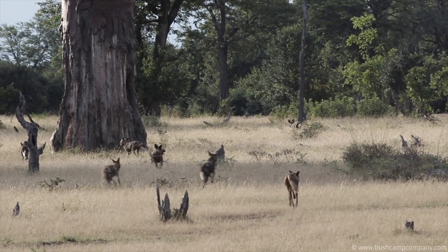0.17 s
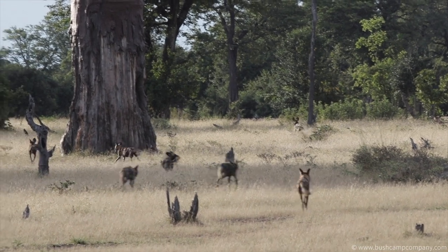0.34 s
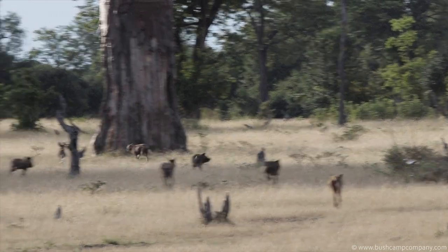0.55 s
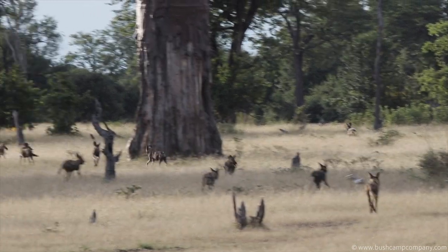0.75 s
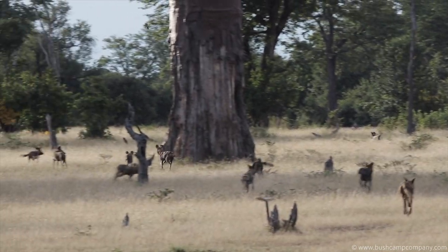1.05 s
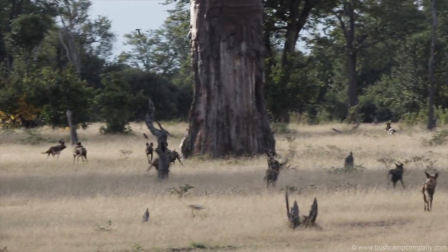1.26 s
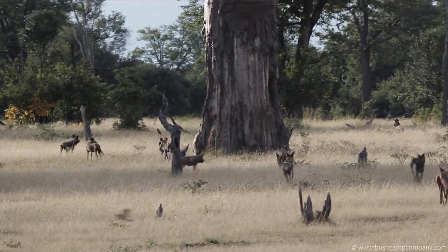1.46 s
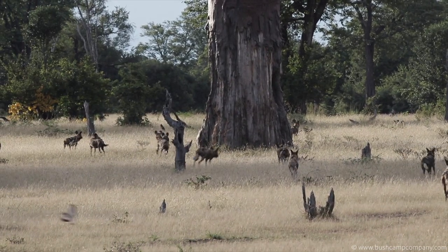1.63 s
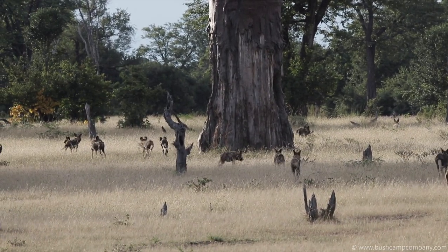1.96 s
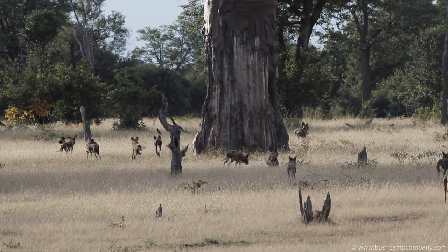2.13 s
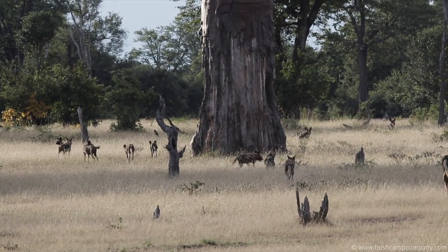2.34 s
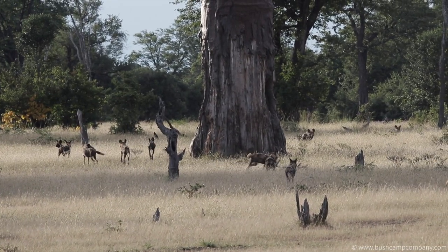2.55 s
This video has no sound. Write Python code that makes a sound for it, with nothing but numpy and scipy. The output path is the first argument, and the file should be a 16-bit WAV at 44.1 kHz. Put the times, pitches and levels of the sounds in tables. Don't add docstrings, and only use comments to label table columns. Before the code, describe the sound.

Wild dogs give overlapping squeaky twitters, off to the right, while low wind gusts thump the microphone.

```python
import sys
import numpy as np
from scipy import signal
from scipy.fft import rfft, irfft
from scipy.io import wavfile
from scipy.ndimage import uniform_filter1d

SR = 44100
rng = np.random.default_rng(int(sys.argv[2]) if len(sys.argv) > 2 else 0)


def boost_factor(decibels):
    exponent = np.asarray(decibels, float) / 20
    return 10 ** exponent


def store_wav(level_fs):
    pcm = np.round(np.clip(np.atleast_2d(level_fs), -1, 1) * 32767)
    wavfile.write(sys.argv[1], SR, pcm.T.astype(np.int16))


N = 119070

# [f/Hz, level/dB]
HISS_SPECTRUM = [(150, -13), (480, -8), (720, -8.5), (900, -15), (2800, -17.5), (5000, -23), (9000, -22.5),
                 (15000, -31.5)]

# [start t/s, length/s, level/dB]
RIGHT_GUSTS = [(0, 0.46, -44), (.222, 0.023, -17.5), (.25, .035, -19), (.335, 0.09, -17),
               (.435, 0.077, -16), (.51, 0.12, -26), (.58, 0.028, -19), (.715, 0.21, -24.5),
               (.95, 0.1, -29), (1.08, 0.1, -18), (1.205, 0.029, -12), (1.255, .18, -19.5),
               (1.465, 0.047, -18.5), (1.51, 0.21, -27.5), (1.6, 0.099, -37), (1.74, 0.5, -32),
               (1.88, 0.185, -30), (2.215, 0.093, -32.5), (2.31, .14, -37.5)]
LEFT_GUSTS = [(.27, 0.032, -40), (.36, 0.025, -44), (.45, 0.102, -45.5), (.66, 0.021, -43),
              (.705, 0.031, -30.5), (.75, 0.16, -50), (.95, 0.145, -48), (1.25, .14, -54),
              (1.47, 0.12, -54), (2.06, 0.025, -57), (2.2, 0.03, -42), (2.38, 0.074, -48), (.08, 0.19, -55),
              (1.64, 0.2, -61), (2.47, 0.13, -62)]
# [low f/Hz, high f/Hz, slope/(dB per gust dB), offset/dB, rate/(1/s), size scatter/dB]
EDDIES = [(36, 80, 0.6, -20.5, 900, -1.5), (74.5, 165, 0.62, -20.5, 300, 2.0),
          (152.4, 322, 1.04, -15, 200, 4), (265, 502, 1.92, -8, 220, 2)]
LEFT_TILT_DB = (27.4, 20, 18, 35)
# [t/s, f/Hz, peak level/dB]
THUMPS = [(0.23, 242, -14.5), (0.237, 186, -11.5), (0.245, 126, -19.5), (0.253, 287.4, -18),
          (0.257, 95, -20.5), (0.265, 285, -20.5), (0.27, 330, -20), (0.273, 167, -19), (0.343, 222, -23.5),
          (0.351, 254, -15), (0.357, 123, -14.5), (0.378, 108, -27), (0.389, 191, -19.5),
          (0.397, 250, -16.5), (0.413, 122, -18), (0.415, 216, -31), (0.435, 226, -15), (0.446, 109, -20),
          (0.455, 165, -15.5), (0.455, 280, -15.5), (0.458, 285, -13.5), (0.464, 308, -15),
          (0.481, 125, -25), (0.49, 252, -14.5), (0.496, 195, -21), (0.524, 192, -20.5), (0.609, 146, -19),
          (0.739, 143, -21), (0.765, 274, -18), (0.791, 142, -26), (0.809, 247, -18.5),
          (0.816, 94.5, -20.5), (0.844, 243, -22), (0.899, 122, -16.5), (0.99, 168, -23),
          (1.082, 165, -19.5), (1.114, 125, -29), (1.133, 145, -16.5), (1.145, 263, -19.5),
          (1.154, 112, -18), (1.165, 215, -25), (1.219, 229, -16.5), (1.22, 95, -18), (1.228, 221, -18),
          (1.256, 188, -22), (1.279, 165, -20.5), (1.297, 163, -15.5), (1.305, 215, -24.5),
          (1.312, 190, -18), (1.343, 126, -15), (1.358, 108, -33), (1.389, 142, -15.5), (1.402, 223, -20),
          (1.425, 166, -23), (1.477, 190, -25), (1.498, 145, -20), (1.512, 125, -21), (1.584, 161, -23.5),
          (1.915, 121, -20), (2.289, 150, -21.5)]

# [level/dB, low f/Hz, high f/Hz, T60/s, left port level/dB]
BURSTS = [
    (-43, 1000, 2600, .055, 0),
    (-34.5, 700, 1250, .025, -20),
]
BURST_TIMES = (.4062, .229)
# (t/s, half length/s, level/dB, low f/Hz, high f/Hz)
SWISH = (2.32, .075, -56.5, 7000, 10500)

# [start t/s, end t/s, top pitch f/Hz, level/dB]
SLOW_DOG = [(0, .147, 1440, -48.5), (.24, .382, 1375, -49.5), (.49, .624, 1445, -51),
            (.71, .872, 1404, -51.5), (.96, 1.122, 1386, -51.5), (1.23, 1.388, 1439, -47.5),
            (1.465, 1.63, 1361, -46), (1.73, 1.892, 1374, -48), (2.01, 2.168, 1340, -47.5),
            (2.36, 2.494, 1329, -49), (2.62, 2.79, 1327, -48)]
QUICK_DOG = [(-.06, .045, 1495, -56.5), (.16, .274, 1513, -56), (.66, .78, 1454, -61.5),
             (.9, 1.01, 1530, -66.5), (1.49, 1.595, 1505, -52.5), (1.69, 1.802, 1528, -50.5),
             (1.91, 2.02, 1540, -53), (2.13, 2.228, 1520, -59), (2.555, 2.675, 1520, -53.5)]
FAR_DOG = [(.71, .83, 1760, -56), (.98, 1.07, 1680, -55), (1.33, 1.395, 1550, -50), (1.77, 1.86, 1700, -57),
           (2.02, 2.13, 1680, -55), (2.25, 2.34, 1740, -54), (-.02, .06, 1200, -51), (.3, .42, 1560, -56),
           (.27, .4, 1100, -55), (.07, .14, 1560, -54), (.72, .8, 1050, -56), (1.5, 1.58, 1750, -56),
           (1.7, 1.76, 1750, -54), (.43, .54, 1250, -52)]
HELD_DOG = [
    (2.335, 2.446, 1545, -45),
    (1.185, 1.335, 1300, -49),
    (2.24, 2.32, 1380, -52),
    (2.5, 2.58, 1150, -56),
    (2.325, 2.4, 1170, -52),
]
SINKING_DOG = [
    (1.79, 1.85, 1040, -46),
    (1.85, 1.892, 760, -50),
]
LOUD_DOG = [
    (.42, .553, 1432, -43.5),
    (1.225, 1.343, 1425, -43.5),
]
CLEAR_DOG = [
    (.365, .535, 1770, -50),
    (1.13, 1.29, 1690, -47),
]

# (start below top/share, climb/s, steady creep/share, final drop/share,
# drop time/s, swell/dB, fade in the drop/dB)
SLOW_THROAT = (.26, 0.026, 0.145, .085, .028, 14, 5)
QUICK_THROAT = (.12, .03, .16, .13, .013, 12, 10)
FAR_THROAT = (0.0543, 0.0397, 0.18, 0.106, 0.01344, 0.43, 1.2)
HELD_THROAT = (0.038, 0.0219, 0.0597, 0.11, 0.0132, 6, 8)
SINKING_THROAT = (.01, .02, -.22, .02, .01, 1, 4)
LOUD_THROAT = (.14, .035, .05, .11, .016, 17, 5)

# [level/dB, left port level/dB, left port lead/rad]
SLOW_PARTIALS = [(3, -9, 0.29), (5.5, -10.5, 2), (-1, -8.5, 2.1), (-9, 0.5, 2.5), (-4, 0.5, 2.34),
                 (-6, -11, 2.8)]
QUICK_PARTIALS = [(0, -6, -0.65), (8.5, -12, 0.7), (1, -7, -0.88), (-12, 1.5, 1.33), (-6.5, -2, 1.7),
                  (-6.5, -7, 1.6)]
FAR_PARTIALS = [(-16, -6, .1), (-1.5, -6, .6), (-22, -4, .1)]
HELD_PARTIALS = [(-6.5, -8, .1), (3, -14, 0.6), (-15, -11, 0.66)]
CLEAR_PARTIALS = [(-12, -6, .1), (-2.5, -8, .6), (-19, -4, .1)]


def unit(x):
    return x / np.sqrt(np.mean(np.abs(x) ** 2))


def band(x, lo_hz, hi_hz, order=2):
    return signal.sosfilt(signal.butter(order, [lo_hz, hi_hz], "band", fs=SR, output="sos"), x)


def walk(rate_hz):
    k = max(int(SR / rate_hz), 2)
    return unit(uniform_filter1d(uniform_filter1d(rng.standard_normal(N), k), k))


def hiss():
    level_db, left_db, shared = -50.5, -2.5, 0.39
    f = np.fft.rfftfreq(N, 1 / SR)
    hz, db = np.array(HISS_SPECTRUM).T
    noise = rng.standard_normal((3, N))
    colour = boost_factor(np.interp(np.log(f + 1), np.log(hz), db)) * (f > 60)
    x = irfft(rfft(noise[:2] + shared * noise[2]) * colour, N)
    return unit(x) * boost_factor(level_db + walk(8)) * boost_factor([[left_db], [0]])


def wind(gusts, calm_db, tilt_db, steep):
    edge_s, flutter_db = 0.013, 2.0
    t = np.arange(N) / SR
    power = boost_factor(calm_db) ** 2
    for start, length, db in gusts:
        inside_s = np.minimum(t - start, start + length - t)
        power = power + boost_factor(db) ** 2 * np.clip(inside_s / edge_s + .5, 0, 1) ** 2
    gust_db = 10 * np.log10(power) + flutter_db * walk(35.0)
    out = 0
    for (lo, hi, slope, off_db, rate, scatter_db), tilt in zip(EDDIES, tilt_db):
        luck = rng.random((3, N))
        size = boost_factor(-scatter_db * np.log(luck[2] + 1e-4))
        kicks = (luck[0] < rate / SR) * np.sign(luck[1] - .5) * size
        kicks = kicks / np.sqrt(np.mean(band(kicks, lo, hi) ** 2))
        drive = boost_factor((slope + steep) * gust_db + off_db + tilt)
        out = out + band(kicks * drive, lo, hi, order=3)
    return out


def thumps():
    spread_cycles, trim_db = 0.44, -1
    near = np.arange(-SR // 40, SR // 40)
    out = np.zeros((2, N))
    for (at, hz, db), turn in zip(THUMPS, rng.random((len(THUMPS), 1))):
        cycles = near / SR * hz
        push = np.exp(-(cycles / spread_cycles) ** 2 / 2) * np.cos(2 * np.pi * (cycles + turn))
        out[1, int(at * SR) + near] += boost_factor(db + trim_db) * push
    return out


def grass():
    t = np.arange(N) / SR
    at, half_s, db, lo_hz, hi_hz = SWISH
    swell = np.exp(-((t - at) / half_s) ** 2 / 2) * boost_factor(db + 2 * walk(60))
    return swell * unit(band(rng.standard_normal((2, N)), lo_hz, hi_hz))


def short_bursts():
    t = np.arange(N) / SR
    out = np.zeros((2, N))
    for at, (db, lo_hz, hi_hz, t60, left_db) in zip(BURST_TIMES, BURSTS):
        env = np.clip((t - at) / 0.0024, 0, 1) * boost_factor(db + 20.5 - 60 * np.abs(t - at) / t60)
        out += band(rng.standard_normal(N) * env, lo_hz, hi_hz) * boost_factor([[left_db], [0]])
    return out


def echoes(x):
    level_db, t60_s = -12.5, 0.088
    t = np.arange(SR // 3) / SR
    tail = rng.standard_normal((2, len(t))) * boost_factor(-60 * t / t60_s) * (t > .004)
    tail = tail / np.sqrt(np.sum(tail[0] ** 2))
    return boost_factor(level_db) * signal.fftconvolve(x[1:], tail, axes=1)[:, :N]


def hoarse_flutter():
    core = walk(300) + 1j * walk(300)
    haze = walk(1600) + 1j * walk(1600)
    return unit(core + .6 * haze)


def breath_noise():
    air = rng.standard_normal((2, N))
    breath = boost_factor(-8.5) * unit(band(air, 5970, 9100))
    rasp = boost_factor(-12) * unit(band(air, 3300, 6300))
    return breath + rasp * [[.5], [1]]


def dog(calls, throat, hoarse, partials):
    low, climb, creep, drop, fall, swell_db, fade_db = throat
    attack_s, release_s, chest_hz = 0.0016, 0.0028, 1244
    bloom, low_bloom = .65, 1.2
    low_purity, high_rasp = .55, 1.35
    effort, drop_dull_db = .35, 6
    t, out = np.arange(N) / SR, np.zeros((2, N))
    wobble = 1 + .008 * walk(100.0)
    flutter = [hoarse_flutter() for _ in partials]
    patchy = [boost_factor(2.2 * walk(45)) for _ in partials]
    breath = breath_noise()
    for start, end, top_hz, db in calls:
        s = slice(max(int(start * SR), 0), min(int((end + .02) * SR), N))
        age, left, length = t[s] - start, end - t[s], end - start
        part = np.clip(age / length, 0, 1)
        falling = np.clip(1 - left / fall, 0, 1.3)

        rise = np.maximum(np.exp(-age / climb) - np.exp(-(length - fall) / climb), 0)
        steady = np.clip((left - fall) / length, 0, 1)
        plunge = np.minimum(1.7 * falling, 1 + 0.21 * falling) ** 1.48
        hz = top_hz * (1 - low * rise - creep * steady - drop * plunge) * wobble[s]
        phase = 2 * np.pi * np.cumsum(hz) / SR

        env = boost_factor(db - swell_db * (1 - part) ** 2 - fade_db * falling ** 2)
        env = env * np.clip(age / attack_s, 0, 1) * np.clip(left / release_s + 1, 0, 1)
        rough = hoarse[0] + (hoarse[1] - hoarse[0]) * part ** 1.5
        upper_db = effort * (db + 52) - drop_dull_db * falling
        for k, (gain_db, left_db, lead) in enumerate(partials):
            r = np.minimum(rough * (low_purity, 1, high_rasp)[min(k, 2)], .97)
            folds = np.sqrt(1 - r ** 2) + r * flutter[k][s]
            chest = 1 / (1 + (chest_hz / hz / (k + 1)) ** 8)
            onset = part ** ((k - 1) * bloom if k else low_bloom)
            gain = np.sqrt(2) * boost_factor(gain_db + (k > 1) * upper_db)
            tone = gain * env * patchy[k][s] * folds * chest * onset * np.exp(1j * (k + 1) * phase)
            out[:, s] += [(tone * boost_factor(left_db) * np.exp(1j * lead)).real, tone.real]
        out[:, s] += env * part * breath[:, s]
    return out


def dog_pack():
    return (dog(SLOW_DOG, SLOW_THROAT, (.85, .35), SLOW_PARTIALS)
            + dog(QUICK_DOG, QUICK_THROAT, (.93, .45), QUICK_PARTIALS)
            + dog(FAR_DOG, FAR_THROAT, (.9, .75), FAR_PARTIALS)
            + dog(HELD_DOG, HELD_THROAT, (.75, .55), HELD_PARTIALS)
            + dog(SINKING_DOG, SINKING_THROAT, (.75, .55), FAR_PARTIALS)
            + dog(LOUD_DOG, LOUD_THROAT, (.97, .35), QUICK_PARTIALS)
            + dog(CLEAR_DOG, FAR_THROAT, (.6, .95), CLEAR_PARTIALS))


def scene():
    pack = dog_pack()
    distant = pack + echoes(pack)
    left_wind = wind(LEFT_GUSTS, -71, LEFT_TILT_DB, 0.44)
    right_wind = wind(RIGHT_GUSTS, -60, np.zeros(4), 0)
    gusts = np.array([left_wind, right_wind])
    return distant + gusts + short_bursts() + grass() + hiss() + thumps()


def roll_off(x):
    return signal.sosfilt(signal.butter(12, 15680, fs=SR, output="sos"), x)


def record(dry):
    mix = signal.sosfilt(signal.ellip(8, .2, 70, 15700, fs=SR, output="sos"), dry)
    return roll_off(mix)


dry = scene()
out = record(dry)
store_wav(out)
```